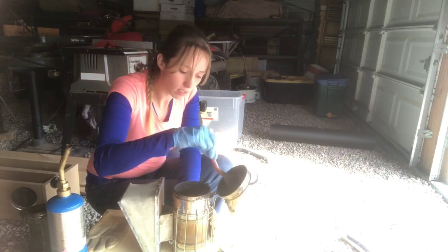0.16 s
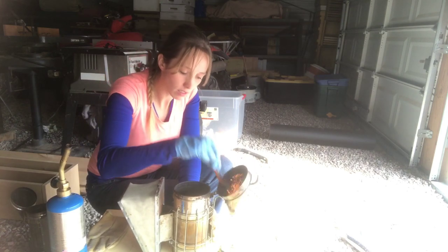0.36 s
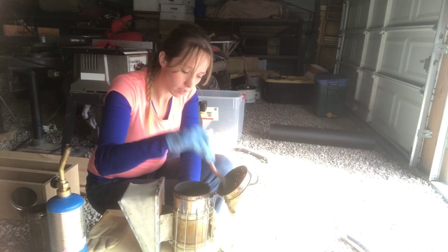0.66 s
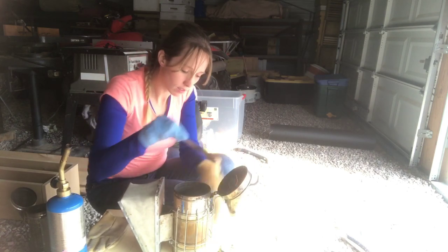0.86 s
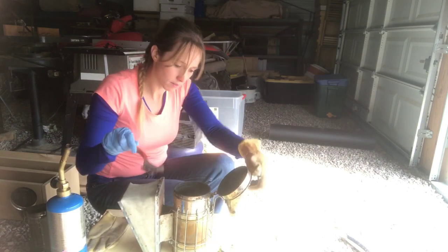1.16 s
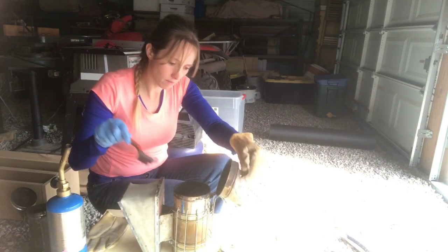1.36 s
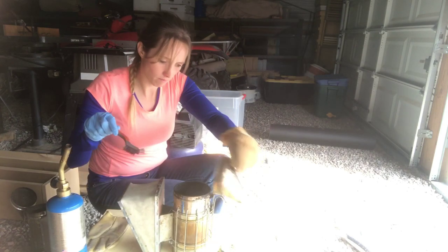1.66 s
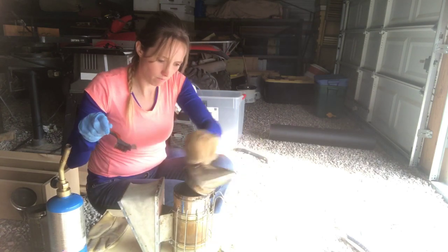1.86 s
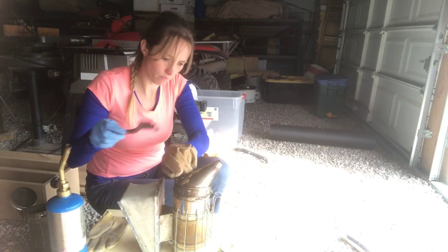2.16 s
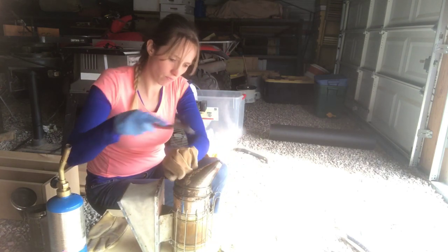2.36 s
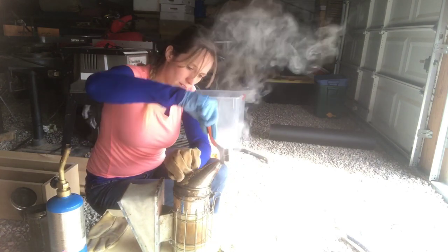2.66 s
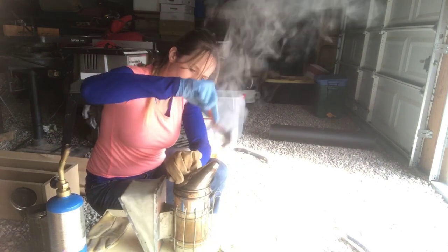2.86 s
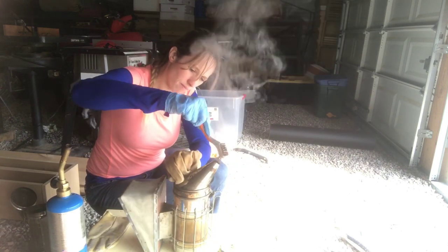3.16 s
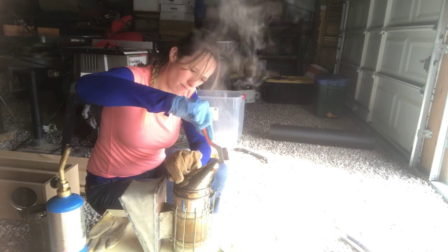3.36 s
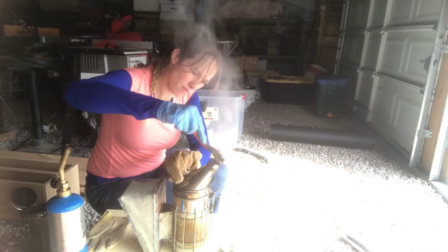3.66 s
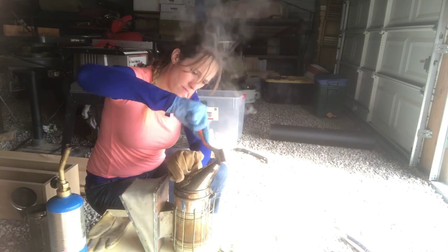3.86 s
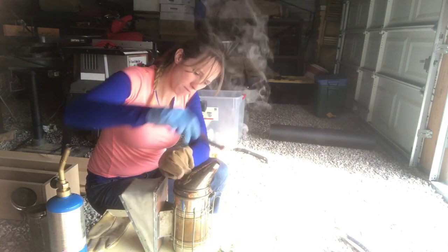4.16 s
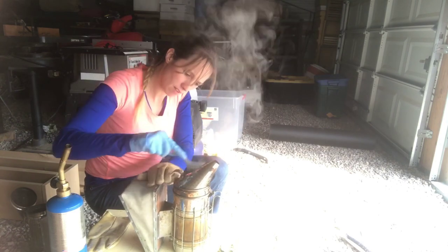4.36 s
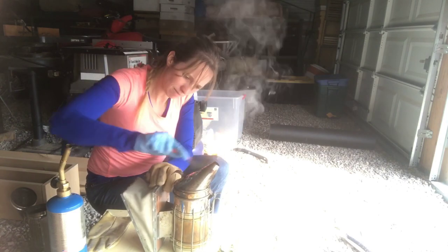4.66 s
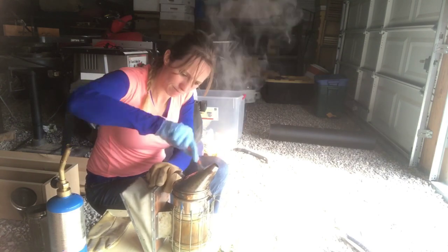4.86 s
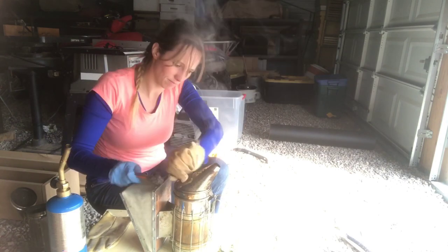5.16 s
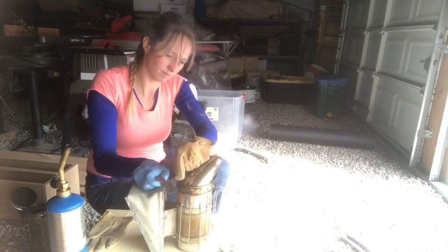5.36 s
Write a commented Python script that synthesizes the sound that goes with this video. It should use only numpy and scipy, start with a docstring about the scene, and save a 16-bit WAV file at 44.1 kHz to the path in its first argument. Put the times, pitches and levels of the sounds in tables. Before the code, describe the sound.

Close mono handwork in an open garage with short, dull reflections. From 0 to 0.45 s a metal smoker can scrapes and bumps softly on a cloth-covered box; sparser rubs follow until about 0.9 s. Gritty drags return from 0.9 to 1.8 s, with padded landings near 1.2 and 1.45 s and a harder, cracking cluster around 1.7 s. It grows quiet; around 2.2 s the lid rubs shut with faint rim tones and hiss. At about 2.45 s the sound abruptly loses bass. A wire brush gives sharp knocks at 2.65-2.85 s, then light, uneven scratches. Strokes resume around 3.9 s with dull thuds, becoming dense, bright and clicking from 4.3 to 4.95 s. Softer rasping follows, with sharper catches near 5.3 and 5.48 s. A faint bee hums intermittently after 2.4 s over soft air noise and weak rumble.

```python
"""In an open garage a tin can is dragged over a cloth-covered box: soft grit rubs its modes, hard landings ring them.
The lid is pushed shut with a rubbing hiss and rim tones; then the sound turns thinner, with less bass.
A wire brush rasps over the sooty lid in short strokes: dense, uneven bristle catches drive the lid modes.
Knocks and bright bristle flicks on the lid are clicks and chatter ringing it. A bee, nearly a pure gliding tone,
drones faintly nearby. Short reflections of the handwork, garage air and a low rumble lie behind it."""
import sys
import numpy as np
from scipy import signal
from scipy.fft import rfft, irfft
from scipy.io import wavfile

SR = 44100
rng = np.random.default_rng(int(sys.argv[2]) if len(sys.argv) > 2 else 0)


def file_out(sig):
    """Save sig as 16-bit WAV at sys.argv[1]."""
    # one column per channel
    cols = np.atleast_2d(sig).T
    # limit, then scale
    lim = np.clip(cols, -1, 1)
    pcm = np.round(lim * 32767).astype(np.int16)
    wavfile.write(sys.argv[1], SR, pcm)


N = 243515

# can modes: f/Hz, level/dB, t60/s
CAN_MODES = [(148, 5.5, 0.079), (200.5, 7.5, 0.056), (274, 0, 0.052), (343, -2.5, 0.091), (459, 2.5, 0.064),
             (529.5, 11.5, 0.051), (963, 0, 0.26), (1080, -21, 0.071), (1466, 3, 0.039), (1610, 8, 0.0073),
             (2048, 0, 0.031), (2870, 0, 0.064), (4200, -2, 0.005), (5900, -26, 0.037), (6650, -7, 0.042),
             (8770, -18, 0.017), (9600, -22, 0.02)]
# lid modes: f/Hz, rubbed level/dB, t60/s, struck level/dB
LID_MODES = [(442, -14.5, 0.033, -7), (505.6, -73, 1.38, -20.5), (580, -0.5, 0.044, -0.5),
             (679, 1.5, 0.03, 4), (836, 6.5, 0.021, -2), (1082, -0.5, 0.038, -9), (1440, -1.5, 0.022, -1),
             (1624, -14, 0.09, -9), (1790, -7, 0.0099, 14.5), (2132, -10.5, 0.051, 9),
             (1990, -17.5, 0.5, -22), (2174, -0.5, 0.014, 11.5), (2700, -15, 0.017, -1.5),
             (3380, -26, 0.036, -8), (3650, -22, 0.055, 4.5), (3950, 10.5, 0.012, 5.5),
             (4185, 13.5, 0.0098, -1), (4620, -9, 0.025, 3.5), (4894, 9.5, 0.0049, -7),
             (5200, -1.5, 0.0047, 6), (5353, 0, 0.013, 11), (5690, 5, 0.021, 6.5), (6190, 5, 0.011, -5.5),
             (6800, 1.5, 0.024, -21), (7330, -5.5, 0.00075, -23), (8310, -14, 0.057, -3),
             (8840, -20, 0.018, -25), (10520, -15, 0.017, -23), (11460, -11.5, 0.032, -18),
             (12600, -9, 0.0068, -23)]
# edges of the lid's pitch zones: f/Hz
LID_EDGES_HZ = [400, 1500, 3100, 7000, 15900]
# knocks and bristle flicks on the lid: t/s, strength/dB, tilt/(dB/octave), long rings/dB, rim rings/dB
LID_KNOCKS = [(2.6579, -12, -3.5, -5.5, 6), (2.718, -7.5, 3, -1, -6), (2.7585, -21, 0.5, -2, 8),
              (2.827, -51.5, 16, -10, -5), (3.331, -48.5, 15, 1, -7.5), (3.892, -25.5, -1.5, -3, 5),
              (3.968, -17, -2.5, -21, 3.5), (4.573, -35, 3, 16, -10), (4.64, -37.5, 10, -8, -13),
              (4.704, -48, 4, -9, 0), (4.829, -18.5, 2.5, -24, -12), (4.859, -24, 5.5, -2, -8),
              (4.983, -63, 13.5, -16, 12), (5.294, -25, 7.5, -12, -12), (5.4742, -18, -1, -11, -4)]


def from_db(db):
    """Gain of a level in dB."""
    return 10 ** (np.asarray(db) / 20)


def rms_one(x):
    """Scale to rms 1."""
    return x / np.sqrt(np.mean(x ** 2) + 1e-20)


def butter(x, order, f_hz, kind):
    """Butterworth filter: low, high or band."""
    return signal.sosfilt(signal.butter(order, f_hz, kind, fs=SR, output="sos"), x)


def in_time(rows):
    """Interpolate level columns to every sample; -200 dB outside the table."""
    t_s, *columns = np.transpose(rows)
    return [np.interp(np.arange(N) / SR, t_s, c, left=-200, right=-200) for c in columns]


def drift(rate_hz):
    """Slow random curve of rms 1: noise through a double pole, computed every 40 samples."""
    r = np.exp(-2 * np.pi * rate_hz * 40 / SR)
    noise = rng.standard_normal(N // 40 + 2002)
    slow = signal.lfilter([1], [1, -2 * r, r * r], noise)[2000:]  # skip the run-in
    return np.interp(np.arange(N) / 40, np.arange(len(slow)), rms_one(slow))


def ring(x, f_hz, t60_s):
    """Two-pole resonator: a unit click starts a decaying sine of height 1."""
    r = from_db(-60 / (t60_s * SR))
    w = 2 * np.pi * f_hz / SR
    return signal.lfilter([0, np.sin(w)], [1, -2 * r * np.cos(w), r * r], x + 1e-18)


def coloured(spectrum):
    """Steady noise of the given spectrum, rms 1."""
    f_hz = np.maximum(np.arange(N // 2 + 1) * SR / N, 1)
    at_hz, level_db = np.transpose(spectrum)
    gain = from_db(np.interp(np.log(f_hz), np.log(at_hz), level_db))
    return rms_one(irfft(rfft(rng.standard_normal(N)) * gain, N))


def grains(per_s, spread_db):
    """Tiny catches of uneven size at random moments, rms 1."""
    sizes = from_db(spread_db * np.minimum(rng.exponential(1, N), 4)) * rng.standard_normal(N)
    return rms_one(sizes * (rng.random(N) < per_s / SR))


def swell(t_s, rise_s, hold_s, fade_s, shape):
    """Sample numbers and heights of one contact that builds up to t_s, holds and dies away."""
    t = np.arange(-SR // 20, SR // 5) / SR
    rise = -(t / max(rise_s, 2e-4)) ** 2
    fade = -(np.maximum(t - hold_s, 0) / max(fade_s, 1e-3)) ** shape
    height = np.exp(np.where(t < 0, rise, fade))
    at = np.round((t_s + t) * SR).astype(int)
    inside = (at >= 0) & (at < N)
    return at[inside], height[inside]


def steady(rows, follows, zone_db):
    """Steady rubbing level in dB per zone; follows picks each zone's level column."""
    return np.array(in_time(rows))[follows] + np.array(zone_db)[:, None]


def pressure(events, rises_s, hold_share, zone_db, colour_shares, fade_shares, steady_db, shape):
    """Contact force per zone: steady rubbing plus swells, each zone with its own fade."""
    force = from_db(steady_db)
    for (t_s, db, *colour_db, fade_s), rise_s in zip(events, rises_s):
        levels_db = db + np.array(zone_db) + np.array(colour_db) @ colour_shares
        for zone, level_db, fade_share in zip(force, levels_db, fade_shares):
            at, height = swell(t_s, rise_s, hold_share * fade_s, fade_s * fade_share, shape)
            zone[at] += from_db(level_db) * height
    return force


def rubbed(force, edges_hz, modes, grit, bare_db, wander_db):
    """Grit heard bare and through each zone's modes, whose drives wander as the contact moves."""
    out = 0
    for push, low, high, open_db in zip(force, edges_hz, edges_hz[1:], bare_db):
        drive = push * grit
        sound = from_db(open_db) * np.sqrt(SR / 2 / (high - low)) * drive
        power = from_db(2 * open_db)
        for f_hz, db, t60_s in modes:
            if low <= f_hz < high:
                even = np.sqrt(4 * np.log(1000) / (t60_s * SR))  # unit noise in, unit ringing out
                wander = from_db(db + wander_db * drift(17.0))
                sound = sound + even * ring(wander * drive, f_hz, t60_s)
                power += from_db(2 * db)
        out = out + butter(sound, 3, [low, high], "band") / np.sqrt(power)
    return out


def can():
    """Dense soft grit under the can; the walls answer a few ms late, cloth dulls the top."""
    # zone edges: f/Hz
    edges_hz = [115, 370, 700, 2300, 6500, 9500, 15900]
    # drags and set-downs: crest t/s, base level/dB, weight/dB, grit/dB, base fade/s
    bumps = [(0.008, -51, 2, 8, 0.013), (0.026, -29.5, 1.5, -16, 0.011), (0.07, -22, -14, -21, 0.019),
             (0.11, -37.5, -4, -5, 0.011), (0.178, -34, 0, -11, 0.011), (0.279, -28, 1, -5, 0.01),
             (0.298, -55.5, 8, 23, 0.033), (0.345, -36, 2, -17, 0.016), (0.392, -24, 2, -17, 0.0082),
             (0.416, -50.5, 14, 16.5, 0.0089), (0.585, -41.5, -11, -36, 0.027), (0.718, -48.5, 7, -42, 0.1),
             (0.85, -84, -2, 41, 0.016), (0.933, -47, 9, 1.5, 0.11), (0.994, -32.5, -9, -9, 0.045),
             (1.025, -39, 19, -10, 0.031), (1.051, -32, -25, -1, 0.024), (1.078, -34, -22, -2, 0.007),
             (1.137, -37, -7, -14, 0.016), (1.179, -31.5, 6, -9.5, 0.015), (1.212, -22.5, -16, -8, 0.024),
             (1.25, -46, 20, -7, 0.03), (1.296, -33, -12, -12.5, 0.011), (1.449, -27.5, 4.5, -4.5, 0.02),
             (1.588, -31.5, 14.5, -5.5, 0.013), (1.612, -29, -5, -13.5, 0.034), (1.702, -35, 4, 18, 0.012),
             (1.725, -48, 0, 5, 0.018), (1.758, -40.5, 6, 3.5, 0.014), (1.769, -43.5, 16, 3.5, 0.024),
             (1.969, -65, 0, 11, 0.024), (2.04, -84, 0, 13, 0.008), (2.291, -73, -2, 27, 0.008),
             (2.36, -80, 0, 27, 0.008)]
    # steady dragging: t/s, body/dB, mid/dB, treble/dB (before the zone offsets)
    drag = [(0.0, -44, -45, -46), (0.014, -52.5, -51, -47.5), (0.04, -46, -52, -57),
            (0.17, -55.5, -53.5, -54.5), (0.19, -57, -61, -58.5), (0.23, -58.5, -67, -70),
            (0.25, -55, -59, -57), (0.276, -52.5, -52, -52), (0.36, -56.5, -69, -64),
            (0.376, -59, -48, -56), (0.394, -59, -65, -60), (0.5, -56, -65.5, -75.5),
            (0.56, -58.5, -68, -76.5), (0.726, -68.5, -80, -77.5), (0.988, -77, -93, -77),
            (1.098, -56.5, -85, -87), (1.162, -55, -87, -85), (1.282, -61.5, -89, -98),
            (1.506, -64.5, -98, -83), (1.648, -55.5, -67, -77), (1.8, -61.5, -102, -90),
            (1.958, -69.5, -72.5, -83.5), (2.44, -67.5, -72, -88)]
    # bump per zone re its base level: level/dB
    bump_zone_db = [-25, -21, -20.5, -23.5, -27.5, -32.5]
    # shares of weight and of grit per zone [1]
    weight_shares = [1.0, 0.28, 0.0, 0.038, 0.1, 0.37]
    grit_shares = [0.71, -0.083, 0.77, 0.95, 0.98, 0.91]
    # fade per zone re base fade [1]
    fade_shares = [0.83, 0.33, 0.6, 0.58, 0.2, 0.12]
    # drag per zone re its column: level/dB
    drag_zone_db = [-4.5, -5.5, -9.5, -6, -5, -4.5]
    # drag column per zone: index
    drag_follows = [0, 0, 0, 1, 2, 2]
    rise_s, hold_share, lag_s = 0.0055, 0.21, 0.0019  # hold re base fade
    tick_s, tick_db = 0.641, -44.5

    force = pressure(bumps, [rise_s] * len(bumps), hold_share, bump_zone_db,
                     [weight_shares, grit_shares], fade_shares,
                     steady(drag, drag_follows, drag_zone_db), shape=0.64)
    force = force * from_db(0.56 * drift(56))
    late = np.exp(-1 / (lag_s * SR))
    force[:2] = signal.lfilter([1 - late], [1, -late], force[:2])  # two lowest zones
    force = force * from_db([2.8 * drift(16.6) for zone in force])  # each zone also flickers alone
    sound = rubbed(force, edges_hz, CAN_MODES, grains(16000, 1.0),
                   bare_db=[1.8, 0.53, 1.2, 7.7, 4.1, 2.6], wander_db=2.0)
    sound = butter(butter(sound, 2, 140, "high"), 1, 13000, "low")

    click = np.zeros(N)
    click[round(tick_s * SR)] = from_db(tick_db)
    tick = ring(click, 1040, 0.012) + from_db(-7) * ring(click, 1280, 0.015)  # small and dry
    return tick + sound


def landings():
    """A hard landing on the box clicks every can mode; box and cloth pass the low ones; the edge cracks."""
    # landings: t/s, thump drive/dB, crack/dB
    blows = [(1.214, -46.5, -55), (1.451, -44, -61), (1.7, -50, -38), (1.706, -37, -63), (1.721, -40, -55)]
    # pass band of box and cloth: f/Hz
    padded_hz = [200, 430]
    # edge of the can: f/Hz, t60/s
    edge = (4170, 0.021)
    t_s, thump_db, crack_db = np.transpose(blows)
    at = np.round(t_s * SR).astype(int)
    crack = np.zeros(N)
    crack[at] = from_db(crack_db)
    thump = 0
    luck_db = rng.normal(0, 2, (len(t_s), len(CAN_MODES)))
    for k, (f_hz, level_db, t60_s) in enumerate(CAN_MODES):
        click = np.zeros(N)
        click[at] = from_db(thump_db + level_db + luck_db[:, k])
        thump = thump + ring(click, f_hz, t60_s) * (-1) ** k
    return butter(thump, 2, padded_hz, "band") + ring(crack, *edge)


def shut():
    """Lid pushed shut: fine friction along the rim keeps three modes sounding under a dull hiss."""
    # push: t/s, rim tones/dB, hiss/dB
    push = [(2.11, -86, -95), (2.172, -64.5, -99), (2.21, -61.5, -66), (2.266, -66, -70.5),
            (2.36, -86, -90)]
    # rim modes: f/Hz, bandwidth/Hz, level/dB
    rim_modes = [(750, 69, -2), (1120, 150, 1.5), (2320, 39, -5)]
    rub = grains(3000, 1.2)
    tone_db, hiss_db = in_time(push)
    tones = 0
    for f_hz, width_hz, db in rim_modes:
        t60_s = np.log(1000) / (np.pi * width_hz)
        tones = tones + from_db(db) * rms_one(ring(rub, f_hz, t60_s))
    hiss = butter(grains(17000, 1.5), 2, [2500, 8500], "band")
    return from_db(tone_db) * tones + from_db(hiss_db) * rms_one(hiss)


def brush():
    """Bristles catch and spring free in uneven bunches; the lid radiates little near 3 kHz."""
    # strokes: crest t/s, base level/dB, lid body/dB, bristle tips/dB, base fade/s
    strokes = [(2.432, -45, 7.5, -8, 0.005), (2.499, -46.5, 10.5, 3, 0.0036), (2.5396, -43, 4, 1, 0.0047),
               (2.578, -36.5, 5, 4, 0.004), (2.599, -39, -16, 1, 0.0056), (2.634, -37.5, 11, 1, 0.003),
               (2.659, -36.5, 15, 2, 0.0059), (2.682, -39, 17, -2, 0.0057), (2.691, -36.5, -3, 6, 0.0051),
               (2.708, -42, -9, -7, 0.003), (2.719, -21, 9.5, -4, 0.0076), (2.752, -34, -4, 6, 0.0026),
               (2.76, -25, 13, -8, 0.0038), (2.829, -39.5, -21, 3, 0.0072), (2.9154, -51.5, -3, -2, 0.017),
               (2.9477, -48.5, 6, 6, 0.0089), (2.9906, -46.5, -14, 2, 0.014),
               (3.0144, -52.5, 0, -1, 0.0075), (3.0734, -53.5, -11, 0, 0.012), (3.1246, -55, 0, -7, 0.014),
               (3.17, -60, -4, -6, 0.008), (3.1824, -54, -12, -7, 0.008), (3.2166, -39.5, -10, -2, 0.01),
               (3.252, -40.5, -6, 1, 0.019), (3.2993, -34, -4.5, -4, 0.0093), (3.3338, -33, -7, -8, 0.0045),
               (3.353, -37, -2, -3, 0.0041), (3.4835, -48, -5, -4, 0.019), (3.527, -64, -13, 0, 0.008),
               (3.5682, -42, -26, -3, 0.0084), (3.639, -44, 0, 3, 0.0024), (3.6656, -47, -13, -9, 0.018),
               (3.7135, -44, 3.5, -5, 0.0054), (3.7645, -53.5, 7, 14, 0.012), (3.8656, -40, 0, -0.5, 0.029),
               (3.8936, -32.5, -6, -2.5, 0.013), (3.9524, -40.5, 8.5, -12, 0.006),
               (3.9724, -31.5, 3, -3.5, 0.011), (4.0144, -34, -5, -7, 0.011), (4.161, -39, 7, -28, 0.0032),
               (4.189, -49, -13, -19, 0.0071), (4.2034, -38.5, 9, 0, 0.0072), (4.2304, -41, -13, 2, 0.016),
               (4.248, -46.5, -5, 5, 0.014), (4.3191, -27, -0.5, 3, 0.012), (4.413, -42.5, 4, 5, 0.01),
               (4.423, -33.5, 2, 9, 0.0068), (4.487, -29, -3.5, 5.5, 0.0095), (4.496, -23, -2, 0.5, 0.005),
               (4.5705, -15.5, -8.5, -1, 0.0061), (4.642, -21.5, -23, -4, 0.0055),
               (4.655, -35.5, 6.5, -1, 0.0085), (4.7025, -30, -16, -4, 0.008), (4.7645, -43, 0, 8, 0.0068),
               (4.774, -42.5, 4.5, 7, 0.0075), (4.813, -33, -10, -9, 0.0094), (4.826, -36.5, -6, 9, 0.0039),
               (4.831, -15.5, -11, 3.5, 0.0045), (4.8603, -21.5, -4, 5, 0.0049),
               (4.894, -34, -12, -8, 0.005), (4.903, -27, -22, 1, 0.0058), (4.9492, -27, -12, -7, 0.0034),
               (4.9854, -62, -8, 1, 0.0054), (5.0684, -48, 15.5, 2, 0.01), (5.107, -44.5, 13, 1, 0.0099),
               (5.154, -57.5, 24, 2, 0.01), (5.185, -43, 11, -1.5, 0.011), (5.219, -45, 12.5, -7, 0.015),
               (5.244, -43, -10, -9, 0.011), (5.2814, -34.5, 6.5, 5, 0.01), (5.2938, -26, 3, 1.5, 0.0083),
               (5.3323, -39.5, 1, 4, 0.013), (5.3647, -50, 5, 8, 0.0098), (5.3852, -44, 5, -11, 0.0082),
               (5.418, -44, 9, 0, 0.0091), (5.476, -39, 16, 6.5, 0.0083), (5.482, -34, -5, -7, 0.0027)]
    # bristles resting and sliding: t/s, rasp/dB, lid body/dB (before the zone offsets)
    slide = [(2.44, -71, -59), (2.49, -72, -67.5), (2.62, -70.5, -49), (2.75, -75, -66), (3.0, -78, -67.5),
             (3.55, -79.5, -70.5), (3.7, -70.5, -62), (3.8, -71.5, -64), (4.06, -73.5, -57.5),
             (4.21, -66, -60.5), (4.3, -64, -60), (4.37, -57.5, -53.5), (4.4, -63, -63), (4.46, -62, -52.5),
             (4.53, -57.5, -59.5), (4.56, -65, -56), (4.6, -63, -60), (4.63, -57.5, -58), (4.68, -62, -57),
             (4.76, -60, -62), (5.02, -68.5, -57.5), (5.3, -79, -75), (5.52, -78, -70)]
    # dull low thuds of the lid under the brush: t/s, base level/dB
    thuds = [(3.934, -39), (4.005, -25), (4.056, -53), (4.085, -39), (4.106, -39), (4.142, -48),
             (4.504, -32), (4.58, -29), (4.651, -22.5), (4.715, -27), (4.777, -33), (4.997, -35),
             (5.039, -45), (5.091, -36), (5.245, -33), (5.404, -44)]
    # stroke per zone re its base level: level/dB
    stroke_zone_db = [-27, -23.5, -19.5, -21.5]
    # shares of body and of tips per zone [1]
    body_shares = [1.0, 0.66, 0.032, 0.0]
    tip_shares = [0.0, 0.0, 0.0, 1.0]
    # fade per zone re base fade [1]
    fade_shares = [0.63, 1.52, 0.94, 0.92]
    # slide per zone re its column: level/dB
    slide_zone_db = [-11, -16.5, -2.5, -1.5]
    # slide column per zone: index
    slide_follows = [1, 1, 0, 0]
    rise_s, knocked_rise_s, hold_share = 0.0041, 0.00039, 0.57  # hold re base fade
    thud_rise_s, thud_fade_s = 0.0011, 0.002

    # a stroke that opens with a knock or flick starts at once
    since_knock_s = np.array(strokes)[:, :1] - np.array(LID_KNOCKS)[:, 0]
    knocked = np.any(np.abs(since_knock_s - 0.002) < 0.0022, axis=1)
    force = pressure(strokes, np.where(knocked, knocked_rise_s, rise_s), hold_share, stroke_zone_db,
                     [body_shares, tip_shares], fade_shares,
                     steady(slide, slide_follows, slide_zone_db), shape=0.9)
    for t_s, db in thuds:
        at, height = swell(t_s, thud_rise_s, 0, thud_fade_s, 0.66)
        force[0, at] += from_db(db - 17.0) * height  # lowest zone only
    force = force * from_db(0.4 * drift(48)) * from_db([2.3 * drift(47) for zone in force])
    sound = rubbed(force, LID_EDGES_HZ, [mode[:3] for mode in LID_MODES], grains(14000, 3.04),
                   bare_db=[4.9, 4.2, 2.1, 3.6], wander_db=4.0)
    return sound - 0.78 * butter(sound, 1, [2550, 3400], "band")


def knocks():
    """A knock or flick is a click and a few ms of chatter; it strikes every lid mode with its own strength."""
    # bands whose lid modes come from the rim: low f/Hz, high f/Hz
    rim_bands_hz = [(3550, 3850), (8000, 8700)]
    chatter_s, hollow_db = 0.0029, 5
    t = np.arange(int(0.03 * SR)) / SR
    chatter, clicks = np.zeros((2, len(LID_KNOCKS), N))
    for row, click, (t_s, db, *_) in zip(chatter, clicks, LID_KNOCKS):
        i = round(t_s * SR)
        row[i:i + len(t)] = from_db(db) * rng.choice([-1, 1], len(t)) * np.exp(-t / chatter_s)
        click[i] = from_db(db)
    blows = from_db(-28.5) * clicks + from_db(-50.0) * chatter

    luck_db = rng.normal(0, 2, (len(LID_KNOCKS), len(LID_MODES)))
    tilt_db, long_db, rim_db = np.array(LID_KNOCKS)[:, 2:].T
    rings = np.zeros(N)
    for k, (f_hz, _, t60_s, db) in enumerate(LID_MODES):
        colour_db = tilt_db * np.log2(f_hz / 2000) + hollow_db * (f_hz < LID_EDGES_HZ[1])
        if t60_s > 0.2:  # long rings have their own level in each knock
            colour_db = long_db
        if any(low < f_hz < high for low, high in rim_bands_hz):
            colour_db = colour_db + rim_db
        strike = from_db(db + luck_db[:, k] + colour_db) @ blows
        rings += ring(strike, f_hz, t60_s) * (-1) ** k
    crack = butter(chatter.sum(axis=0), 3, [300, 7000], "band")
    return butter(rings + from_db(-17) * crack, 2, 240, "high")


def wire():
    """A bunch of bristles springs free: a short noise rattle, heard bare and through their modes."""
    # plucked bristle modes: f/Hz, level/dB, t60/s
    bristle_modes = [(5141, -0.5, 0.22), (5290, -9, 0.065), (7757, -16, 0.084), (8500, -16, 0.13),
                     (9200, -8, 0.1), (9412, -7, 0.088), (9800, -2, 0.054), (10920, -1, 0.028),
                     (12600, -6, 0.088), (13600, -4, 0.065), (14400, -2, .04)]
    start_s, level_db, rattle_s, scratch_db = 2.435, -76, 0.013, 17  # scratch re rattle
    t = np.arange(N) / SR - start_s
    rattle = from_db(level_db) * (t > 0) * np.exp(-(t / rattle_s) ** 2)
    sound = from_db(scratch_db) * butter(rattle * rng.standard_normal(N), 2, 8500, "high")
    for f_hz, db, t60_s in bristle_modes:
        sound = sound + from_db(db) * ring(rattle * rng.standard_normal(N), f_hz, t60_s)
    return sound


def bee():
    """A slightly unsteady wingbeat, nearly a pure tone, gliding from the first pitch to the last."""
    # flights: start t/s, length/s, first mean f/Hz, last mean f/Hz, mean level/dB
    flights = [(2.399, 0.96, 240.8, 231.5, -73.5), (3.503, 0.56, 187, 190, -72.5),
               (4.684, 0.33, 268.7, 217, -71.5), (5.03, 0.82, 237, 237.6, -84.5)]
    edge_s = 0.04  # coming into earshot and leaving
    t = np.arange(N) / SR
    waver, flutter_db = 1 + 0.004 * drift(10), 1.2 * drift(6)
    out = 0
    for start_s, length_s, first_hz, last_hz, db in flights:
        end_s = start_s + length_s
        f_hz = np.interp(t, [start_s, end_s], [first_hz, last_hz]) * waver
        phase = 2 * np.pi * np.cumsum(f_hz) / SR
        near = np.clip(np.minimum(t - start_s, end_s - t) / edge_s + 0.5, 0, 1)
        out = out + np.sqrt(2) * from_db(db + flutter_db) * near * np.sin(phase)
    return out


def garage(x, t60_s):
    """Reflections: a short tail of decaying, dulled noise after 6 ms."""
    t = np.arange(int(0.4 * SR)) / SR
    tail = rng.standard_normal(len(t)) * from_db(-60 * t / t60_s) * (t > 0.006)
    tail = signal.lfilter([0.5], [1, -0.45], tail)
    return signal.fftconvolve(x, tail / np.sqrt(np.sum(tail ** 2)))[:N]


def garage_air():
    """Steady coloured noise for the air plus a low rumble of wandering level."""
    # air spectrum: f/Hz, relative density/dB
    air_spectrum = [(59, -31), (100, 15), (432, -1.5), (816, -0.5), (870, 0.5), (1150, 1.5), (1610, -8),
                    (2570, -3), (2910, -5), (4010, -8), (15900, -28)]
    # rumble spectrum: f/Hz, relative density/dB
    rumble_spectrum = [(15, -40), (25, -44), (54, 3.5), (146, -16), (179, -27), (200, -17), (260, -12.5),
                       (440, -120)]
    air_db, rumble_db = -68.5, -74
    air = from_db(air_db) * coloured(air_spectrum)
    return air + from_db(rumble_db + 5.5 * drift(3.8)) * coloured(rumble_spectrum)


def scene():
    """Handwork and its reflections over bee and garage air."""
    work = can() + landings() + shut() + brush() + knocks() + wire()
    reflections = from_db(-20) * garage(work, t60_s=0.2)
    return (work + reflections + bee() + garage_air())[None]


def record(dry):
    """The later part has less bass; low preamp noise keeps its own; a steep filter cuts the top."""
    thin_from_s, bass_edge_hz, crossfade_s = 2.445, 212, 0.002
    preamp_db, cutoff_hz = -100, 15900
    thin = butter(dry, 5, bass_edge_hz, "high")
    share = np.clip((np.arange(N) / SR - thin_from_s) / crossfade_s, 0, 1)
    noise = signal.lfilter([1], [1, -0.98], rng.standard_normal(N))
    wet = dry + share * (thin - dry) + from_db(preamp_db) * rms_one(noise)
    return signal.sosfilt(signal.ellip(12, 0.5, 60, cutoff_hz, fs=SR, output="sos"), wet)


dry = scene()
out = record(dry)
file_out(out)
```